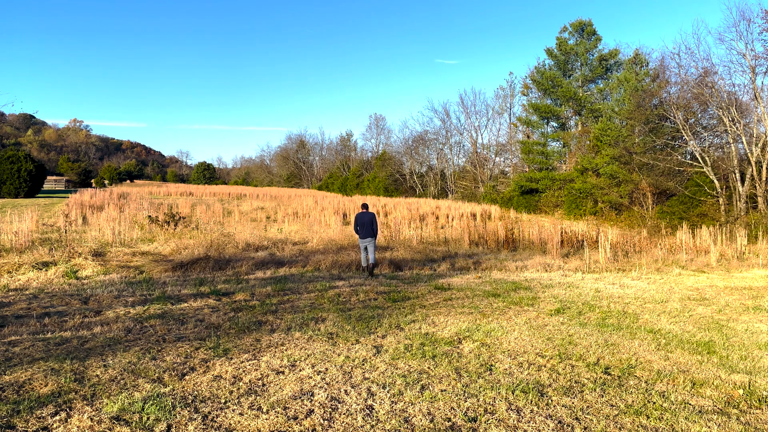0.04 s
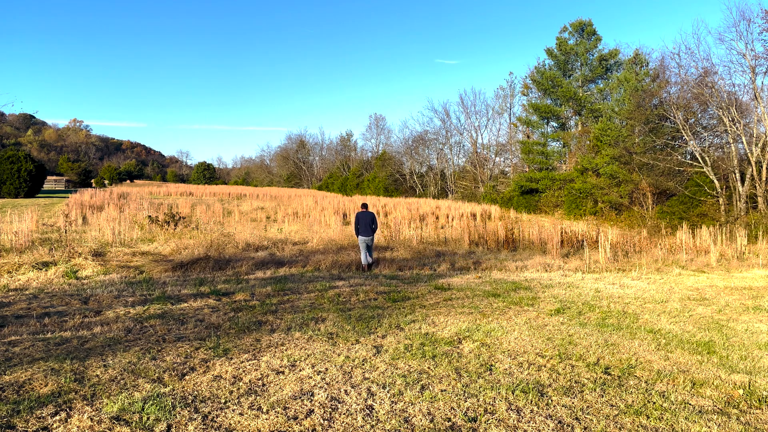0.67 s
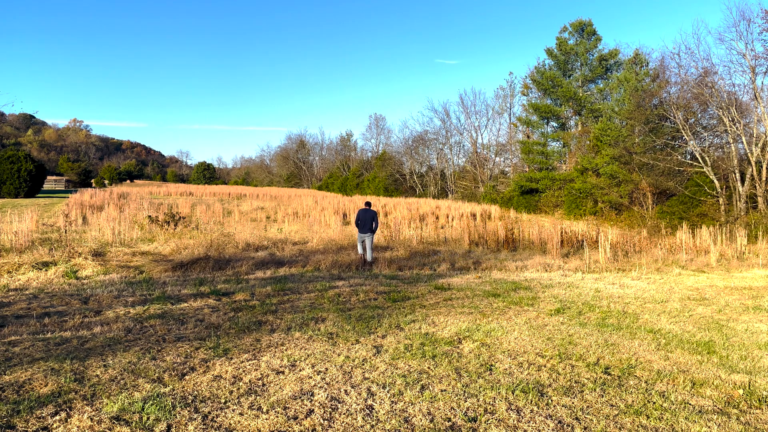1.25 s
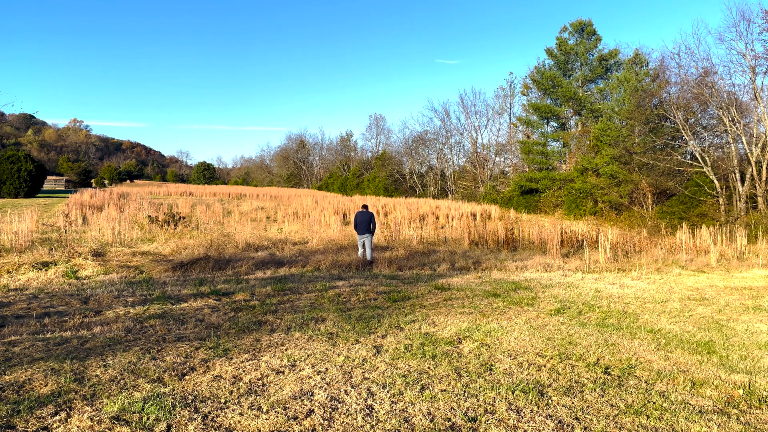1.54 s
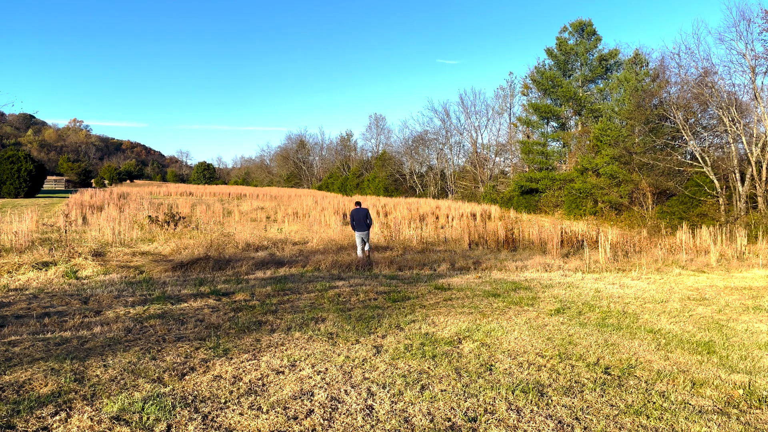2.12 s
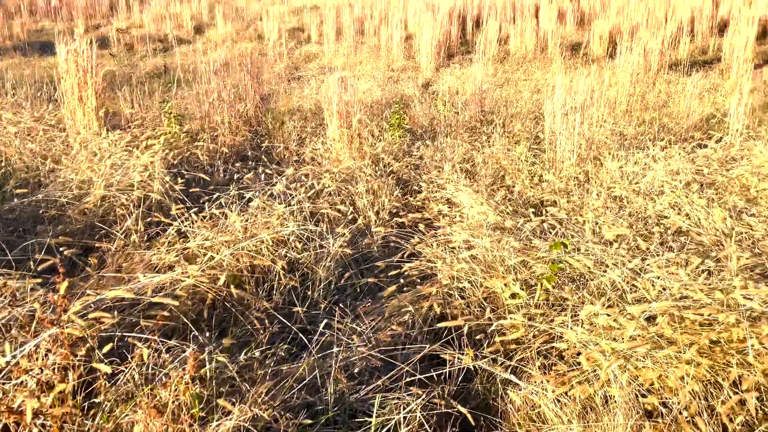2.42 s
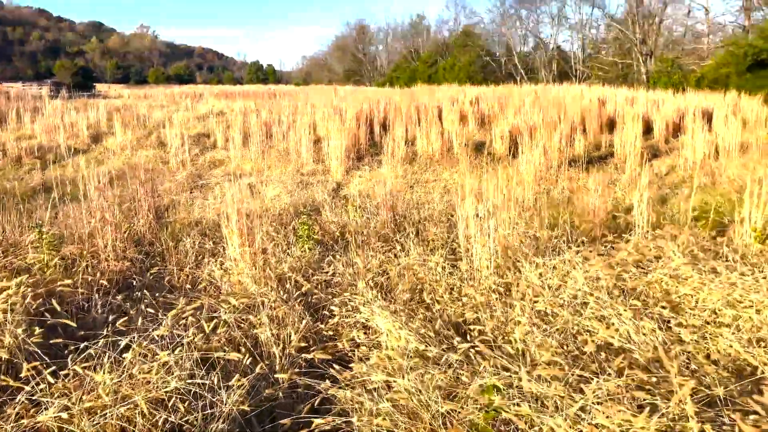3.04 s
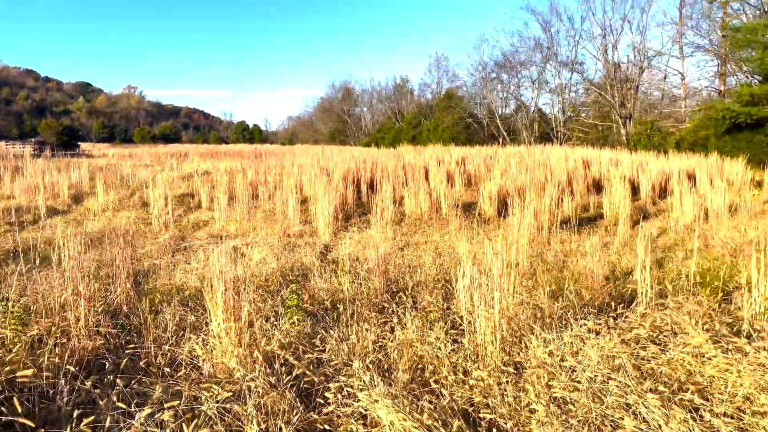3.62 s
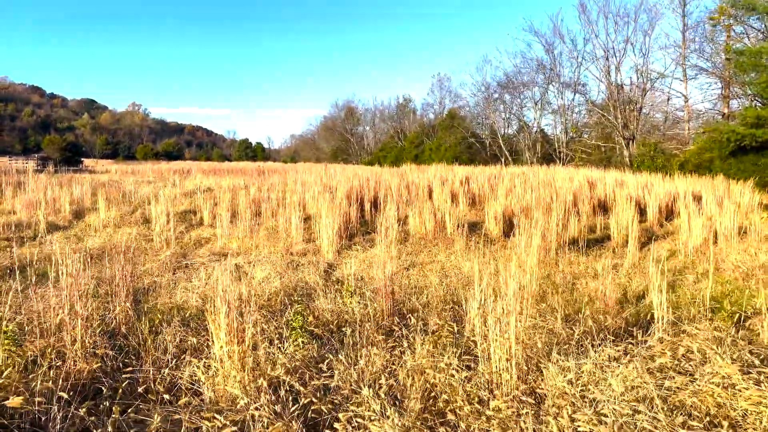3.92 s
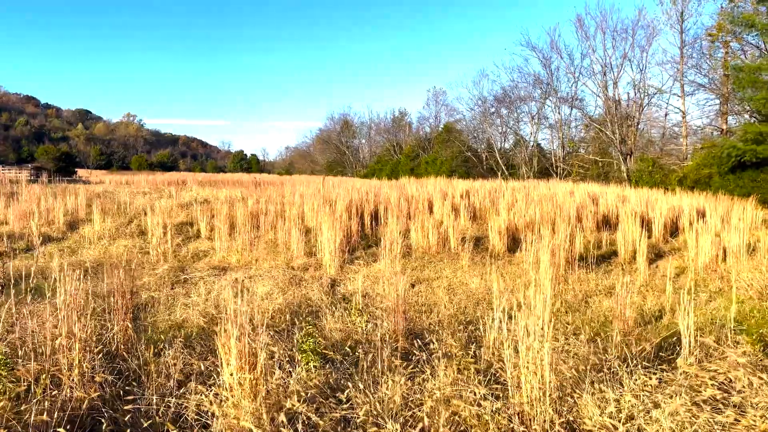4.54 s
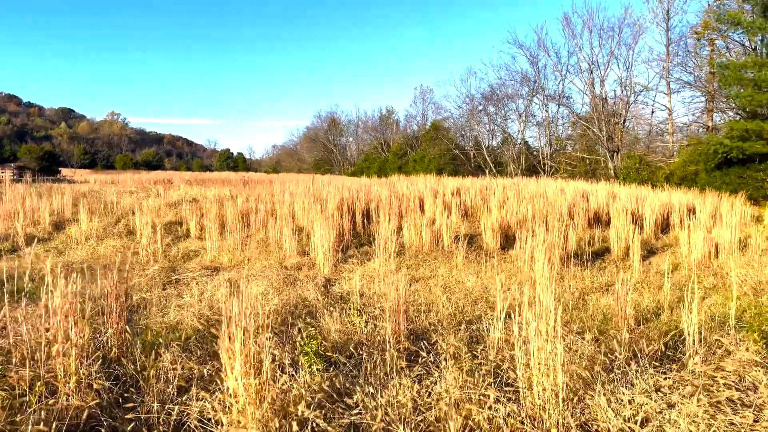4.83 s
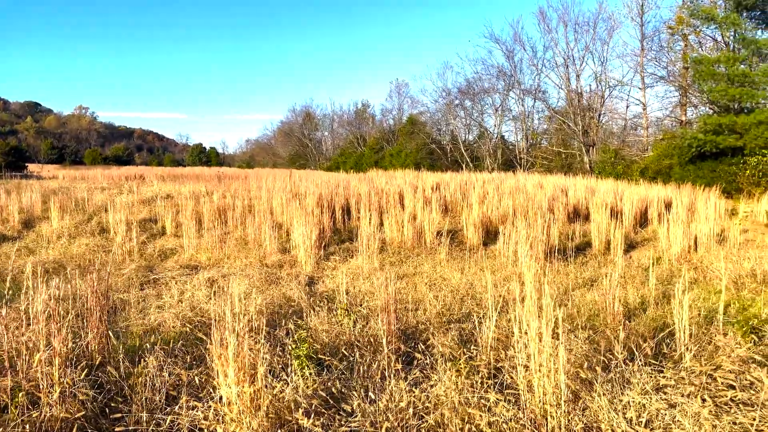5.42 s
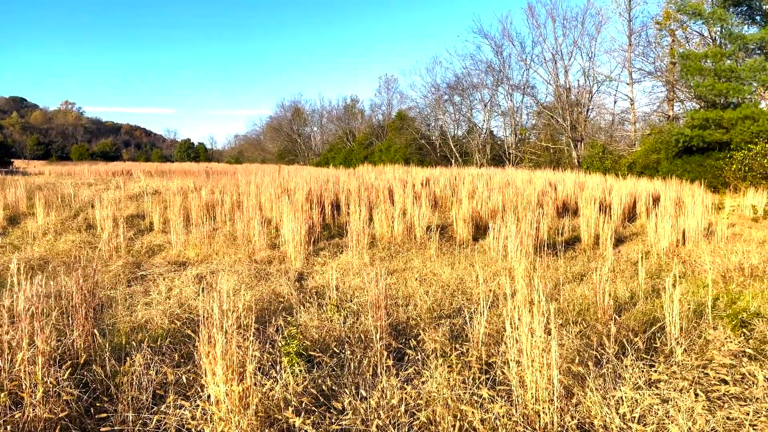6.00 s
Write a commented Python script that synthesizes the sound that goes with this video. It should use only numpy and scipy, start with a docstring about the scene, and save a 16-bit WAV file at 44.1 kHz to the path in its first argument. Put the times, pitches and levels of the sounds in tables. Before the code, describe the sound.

In open country, a phone microphone picks up low wind rumble, a soft hush and the hum of a distant engine. Light steps swish through dry grass at a distance, then suddenly sound close, each uneven stride a shower of tiny crackles with brittle stems breaking. One dull knock comes just after the steps turn close and another near the end, as the engine hum swells and the rustling eases.

```python
"""An open field of tall dry grass, picked up by a phone with two microphone ports. Someone walks through it,
first some way off, then with the stalks brushing close by. Each stride sets off a shower of tiny crackles as
blades catch and slip; single stems snap, and there are two dull knocks. Behind it lie a far engine, a low wind
rumble and the hush of distant traffic."""
import sys
import numpy as np
from scipy import signal
from scipy.fft import rfft, irfft, next_fast_len
from scipy.io import wavfile

SR = 44100
rng = np.random.default_rng(int(sys.argv[2]) if len(sys.argv) > 2 else 0)


def master_out(mix):
    """Clip the mix to full scale and print it as 16-bit PCM to the path in sys.argv[1]."""
    frames = np.transpose(np.atleast_2d(mix))
    ceiling = np.clip(frames, -1, 1)
    pcm = np.round(ceiling * 32767).astype(np.int16)
    wavfile.write(sys.argv[1], SR, pcm)


N = 276066
TIME = np.arange(N) / SR
FFT_SIZE = next_fast_len(N + 8192, True)
BIN_HZ = np.maximum(np.fft.rfftfreq(FFT_SIZE, 1 / SR), 1)
NEAR_FROM_S = 2.18  # the walker is heard close by from here on


def near_steps(blades_db=0.9, stems_db=-2.25, litter_db=4.5, usual_stride_db=-50):
    """Close by, blades swish past the legs and stems and litter crunch; a harder stride moves more."""
    # leg sweeps: start_s, attack_s, length_s, level_db, crunch_share_db, litter_share (0-1 of the crunch)
    strides = [(2.188, 0.012, 0.036, -59, -2.5, .9), (2.385, 0.049, 0.06, -47.5, -6.5, 0.45),
               (2.568, 0.049, 0.033, -45.5, -1.5, 0.07), (2.663, 0.011, 0.025, -49.5, -4, 0.31),
               (2.796, 0.042, 0.073, -48.5, -5, 0.35), (3.14, 0.023, 0.045, -63.5, -1, 1),
               (3.32, 0.051, 0.046, -55, -1.4, 0.57), (3.446, 0.036, 0.044, -63, -5, 0.9),
               (3.674, .02, 0.012, -53, -17, 0.4), (3.797, 0.092, 0.096, -53, -7.5, 0.55),
               (4.11, 0.18, 0.067, -65, 0, .7), (4.407, 0.012, .01, -52.5, -4, 1),
               (4.465, 0.042, .04, -49, -3.5, 0.6), (4.683, 0.059, .12, -51.5, -6, 0.66),
               (4.935, 0.048, 0.11, -65, -.3, 1), (5.166, 0.066, 0.042, -49, -4.5, 0.35),
               (5.511, 0.04, 0.13, -54.5, -6.5, .6), (5.714, 0.11, .16, -64.5, -3, 0.9)]
    # tone of the blades, the brittle stems and the soft litter: frequency_hz, gain_db
    blade_colour = [(400, -28), (1200, -16), (2500, -3.5), (4500, -5.5), (5600, -4.5), (6200, 1.5),
                    (7300, -9), (8800, 5), (12200, 2.5), (14000, -3), (16000, -11)]
    stem_colour = [(300, -24), (700, 5.5), (1150, -6), (1600, 2), (2400, -1.5), (3100, 6), (4200, 5.5),
                   (4900, 4.5), (6500, -22), (9000, -10), (16000, -22)]
    litter_colour = [(200, -23), (500, 9), (800, 3), (1300, 2), (2100, 0), (3200, -7.5), (6000, -7),
                     (9000, -7.5), (16000, -12)]
    blade_power = stem_power = litter_power = 0
    for start_s, attack_s, length_s, level_db, crunch_share_db, litter_share in strides:
        power = leg_sweep(start_s, length_s, level_db, attack_s, release_s=0.055)
        crunch_share = undb(crunch_share_db) ** 2
        blade_power += power * (1 - crunch_share)
        stem_power += power * crunch_share * (1 - litter_share)
        litter_power += power * crunch_share * litter_share
    amplitude = np.sqrt(blade_power + stem_power + litter_power)
    effort = np.maximum(np.sqrt(amplitude / undb(usual_stride_db)), 0.2)
    blades = crackle(7000 * effort, scatter_db=1.1, clump_db=1.12, clump_hz=89, q=2.5, patchy_db=4.4)
    stems = crackle(1200 * effort, scatter_db=1.5, clump_db=1.0, clump_hz=60, q=7.0, patchy_db=6.5)
    litter = crackle(4500 * effort, scatter_db=0.5, clump_db=1.5, clump_hz=87, q=4.8, patchy_db=2.0)
    rustle = (unit_rms(at_ports(blades, blade_colour)) * np.sqrt(blade_power) * undb(blades_db)
              + unit_rms(at_ports(stems, stem_colour)) * np.sqrt(stem_power) * undb(stems_db)
              + unit_rms(at_ports(litter, litter_colour)) * np.sqrt(litter_power) * undb(litter_db))
    return rustle * (TIME >= NEAR_FROM_S)


def far_steps(gain_db=0.07):
    """From a distance the crackles merge into a fine swish for each stride."""
    # leg sweeps some way off: start_s, length_s, level_db
    strides = [(0, 0.014, -60.5), (0.186, .01, -68.5), (0.407, .19, -58.5), (0.712, 0.11, -66),
               (0.977, 0.18, -62), (1.217, 0.2, -56.5), (1.68, 0.17, -67.5), (1.897, 0.28, -60)]
    # tone of the distant blades: frequency_hz, gain_db
    colour = [(400, -15), (1200, -10), (2200, -9.5), (3200, -6), (5000, -6), (6000, -12), (8000, -5),
              (10000, -4), (12000, 1.5), (14000, -1.5), (16000, -10.5)]
    power = sum(leg_sweep(*stride, attack_s=0.067, release_s=0.052) for stride in strides)
    blades = crackle(8300, scatter_db=0.0, clump_db=0.63, clump_hz=190, q=1.23, patchy_db=1.0)
    return unit_rms(at_ports(blades, colour)) * np.sqrt(power) * undb(gain_db) * (TIME < NEAR_FROM_S)


def leg_sweep(start_s, length_s, level_db, attack_s, release_s, sag_db_per_s=14, settle_db=-10.5):
    """Power of the rustle as a leg pushes through: it eases as the stalks give, then they spring back."""
    sag = undb(-sag_db_per_s * np.maximum(TIME - start_s, 0))
    push = swell(start_s, length_s, attack_s, release_s) * sag
    settle = undb(settle_db) * swell(start_s, length_s, attack_s, release_s=0.26)
    return undb(level_db) ** 2 * (push ** 2 + settle ** 2)


def crackle(clicks_per_s, scatter_db, clump_db, clump_hz, q, patchy_db):
    """Dry blades catch and slip: a shower of clicks that swells as each tuft springs free."""
    slips = rng.random(N) < clicks_per_s / SR
    scatter = np.minimum(rng.exponential(size=N), 5)
    clicks = slips * undb(scatter_db * scatter + clump_db * drift(clump_hz)) / np.sqrt(clicks_per_s)
    return stalk_ring(clicks, q, patchy_db)


def stalk_ring(clicks, q, patchy_db):
    """Each click rings its own mix of stalk resonances; gives a direct and a diffuse signal."""
    at = np.flatnonzero(clicks)
    weights = rng.standard_normal((2, N))
    push, out = np.zeros((2, N)), np.zeros((2, N))
    for hz in np.geomspace(800, 14500, 13):
        mix = weights[:, at - rng.integers(N)]
        tuft_gain = undb(patchy_db * drift(18, TIME[at]))  # each tuft favours other resonances
        push[:, at] = clicks[at] * mix * tuft_gain
        out += signal.lfilter(*signal.iirpeak(hz, q, SR), push + 1e-18)
    return out


def stem_snaps(q=1.27, crack_db=-21, gain_db=-2.5, samples=1024):
    """A stem breaks as its fibres tear in a moment and ring it; thick stems ring lower."""
    # the loudest breaking stems: start_s, level_db, pitch_hz, tear_ms
    breaks = [(.4123, -29.5, 13000, .7), (1.910, -36, 12500, .7), (2.201, -37, 12500, .8),
              (2.4079, -26, 11500, 2.3), (2.554, -29.5, 3780, 1.2), (2.592, -28, 3600, 3.6),
              (2.602, -23.5, 2090, 0.79), (2.623, -30.5, 4240, 1.2), (2.6685, -26, 10800, 1.2),
              (2.69, -32.5, 3480, 1.3), (2.7416, -31.5, 4000, 3.7), (2.838, -33, 4330, 2.1),
              (3.347, -30.5, 3050, 2.6), (3.348, -33.5, 1600, 2.9), (4.361, -45, 10400, 1.2),
              (4.691, -32.5, 2270, 3), (4.802, -30.5, 11000, 0.53), (4.84, -33, 5560, 0.46),
              (5.299, -34, 12500, 0.89), (5.537, -34, 3227, .45), (5.7685, -37, 11500, 0.65),
              (5.968, -39.5, 11500, 4.1), (5.9678, -44, 3000, 2.7), (6.0063, -39.5, 11600, 2.5),
              (6.0065, -42.5, 3000, 3.4)]
    # tone of the snaps: frequency_hz, gain_db
    colour = [(400, -32), (1500, -7.5), (13000, 5), (16000, -6)]
    out = np.zeros((2, N))
    t_ms = np.arange(samples) / SR * 1000
    for start_s, level_db, pitch_hz, tear_ms in breaks:
        fibres = rng.standard_normal((2, samples)) * np.exp(-t_ms / tear_ms)
        stem = signal.iirpeak(pitch_hz, q, SR)
        ring = signal.lfilter(*stem, signal.lfilter(*stem, fibres))
        snap = ring + undb(crack_db) * fibres
        i = int(start_s * SR)
        out[:, i:i + samples] += snap / np.abs(snap).max(axis=1, keepdims=True) * undb(level_db + gain_db)
    return at_ports(out, colour)


def knocks(contact_cycles=1.61, samples=4096):
    """Soft, heavily damped blows: the ring swells during the contact and is gone in a few cycles."""
    # three parts to each knock: start_s, peak_db, pitch_hz, t60_s, right_lag_ms, left_minus_right_db
    blows = [(2.5003, -24.5, 768, 0.013, 0.02, 2), (2.5104, -51, 800, .011, 0.02, 1),
             (2.5130, -36.5, 734, 0.015, 0.02, 5), (5.5381, -32.5, 1200, 0.0016, 0.21, 0),
             (5.537, -25, 482, 0.0072, 0.47, 1.5), (5.5376, -32.5, 133, 0.02, 0.4, -4)]
    # what a blow rings with: pitch_ratio, gain_db, t60_ratio
    modes = [(.9, 0.5, 1.3), (1.22, 1, 0.88), (2.7, -14, 1.2)]
    out = np.zeros((2, N))
    for start_s, peak_db, pitch_hz, t60_s, right_lag_ms, balance_db in blows:
        t = np.maximum(np.arange(samples) / SR - np.array([[0], [right_lag_ms / 1000]]), 0)
        contact_s = contact_cycles / pitch_hz
        ring = 0
        for pitch_ratio, gain_db, t60_ratio in modes:
            decay = undb(gain_db - 60 * t / (t60_s * t60_ratio))
            ring += decay * np.cos(2 * np.pi * pitch_hz * pitch_ratio * (t - contact_s))
        ring *= 1 - np.exp(-(t / contact_s) ** 3)
        port_db = peak_db + np.array([[balance_db], [-balance_db]]) / 2
        i = int(start_s * SR)
        out[:, i:i + samples] += ring / np.abs(ring).max() * undb(port_db)
    return out


def stirring_grass(level_db=-68):
    """Close to the microphone a soft rustle goes on between the strides."""
    # tone of the stirring grass: frequency_hz, gain_db
    colour = [(400, -30), (900, 0), (1400, 5.5), (2100, -0.5), (3300, -8), (6000, -9), (12000, -8),
              (16000, -23)]
    rustle = crackle(3300, scatter_db=-1.0, clump_db=3.9, clump_hz=30, q=4.0, patchy_db=0.0)
    return unit_rms(at_ports(rustle, colour)) * undb(level_db) * (TIME >= NEAR_FROM_S)


def far_engine(waver=0.00602, throb_db=2.0):
    """A far engine drones at harmonics of its firing rate and slowly grows."""
    # course of the drone: time_s, firing_hz, level_db
    course = [(0, 62.44, -65.5), (1.9, 61.54, -62), (2.3, 56.6, -56), (4.4, 55.6, -56), (4.9, 55.8, -49.5),
              (5.4, 56.2, -47), (6.26, 56.5, -51)]
    # its harmonics: firing_multiple, gain_db
    harmonics = [(1, -11.5), (2, -1.5), (4, -21)]
    time_s, *columns = np.transpose(course)
    firing_hz, level_db = [np.interp(TIME, time_s, column) for column in columns]
    phase = 2 * np.pi * np.cumsum(firing_hz * (1 + waver * drift(5.98))) / SR
    drone = sum(np.sqrt(2) * undb(gain_db + throb_db * drift(5.9)) * np.sin(multiple * phase)
                for multiple, gain_db in harmonics)
    return drone * undb(level_db + np.array([[0.5], [-0.5]]))


def open_field(rumble_db=-47.5, hush_db=-60, hiss_db=-75, hush_drift_db=0.36, gust_edge_s=0.033):
    """Low wind rumble, the broad hush of distant traffic off to the left, and a faint hiss."""
    # gusts that lift the rumble: start_s, length_s, rise_db
    gusts = [(0.093, 0.09, 2.5), (2.232, 0.099, 3), (2.88, .4, 1), (3.75, 0.12, 1.5)]
    # tone of the wind, the distant traffic and the hiss: frequency_hz, gain_db
    rumble_colour = [(10, -25), (25, -26.5), (40, -9.5), (60, 2.5), (80, -4), (110, -10.5), (160, -18),
                     (240, -24.5), (500, -35), (2000, -112)]
    hush_colour = [(80, -66), (200, -15), (340, -4), (520, 4.5), (720, 4.5), (1000, -6), (1500, -16),
                   (2300, -33), (5000, -58)]
    hiss_colour = [(1200, -5), (2500, -8), (5000, 2.5), (6200, -6), (9000, 4), (12500, 0.5), (16000, -14.5)]
    gust_db = sum(rise_db * swell(start_s, length_s, gust_edge_s, gust_edge_s)
                  for start_s, length_s, rise_db in gusts)
    rumble = air_noise(rumble_colour) * undb(rumble_db + gust_db)
    hush = air_noise(hush_colour, right_lag_ms=0.48) * undb(hush_db + hush_drift_db * drift(2.8))
    hiss = air_noise(hiss_colour) * undb(hiss_db)
    return rumble + hush + hiss


def air_noise(colour, right_lag_ms=0):
    """Steady coloured noise at the two ports."""
    return unit_rms(at_ports(rng.standard_normal((2, N)), colour, right_lag_ms))


def at_ports(pair, colour, right_lag_ms=0):
    """Colour a direct and a diffuse signal at the ports; sound from the left reaches the right late."""
    # the microphone pair: frequency_hz, left_lead_rad, left_minus_right_db, diffuse_share_db
    ports = [(60, .12, .7, -15), (150, .35, 1.6, -11), (600, .4, 3, -5), (950, .3, .5, -5),
             (1400, 0, 0, -7), (2200, .1, -.8, -10), (3300, .8, 3, -8), (5000, 1.1, 7, -6),
             (5900, -.6, 3, -4), (6900, -.4, 2.5, -5), (7700, -2.7, .5, -10), (8500, -3.14, 0, -25),
             (10000, -4.05, 0, -12), (12400, -5.4, 0, -12), (13400, -6.28, 0, -26)]
    lead_rad, balance_db, diffuse_db = per_bin(ports)
    direct, diffuse = rfft(pair, FFT_SIZE)
    share, sides = undb(diffuse_db), np.array([[1], [-1]])
    stereo = (direct + sides * share * diffuse) / np.sqrt(1 + share ** 2)
    stereo *= undb(per_bin(colour)[0] + sides * balance_db / 2)
    stereo[1] *= np.exp(-1j * (lead_rad + 2 * np.pi * BIN_HZ * right_lag_ms / 1000))
    return irfft(stereo, FFT_SIZE)[:, :N]


def swell(start_s, length_s, attack_s, release_s):
    """An envelope that reaches 1 at start_s, holds and dies away."""
    before_s = np.maximum(start_s - TIME, 0)
    after_s = np.maximum(TIME - start_s - length_s, 0)
    return np.exp(-before_s / attack_s - after_s / release_s)


def drift(rate_hz, times=TIME):
    """A random curve that turns rate_hz times a second; spread near 1."""
    knots = rng.standard_normal(4096)
    return 1.222 * np.interp(times * rate_hz, np.arange(len(knots)), knots)


def per_bin(table):
    """The columns of a table over frequency, one value a bin."""
    hz, *columns = np.transpose(table)
    return [np.interp(np.log(BIN_HZ), np.log(hz), column) for column in columns]


def unit_rms(stereo):
    """Scale a stereo pair so that its middle has rms 1."""
    return stereo / np.std(stereo.mean(axis=0))


def undb(db):
    """Decibels to gain."""
    return 10 ** (np.asarray(db) / 20)


def scene():
    """The walk and the field around it; the open ground gives no echo."""
    walk = far_steps() + near_steps() + stirring_grass() + stem_snaps() + knocks()
    return walk + far_engine() + open_field()


def record(dry):
    """The phone cuts the deepest rumble and the top of the treble."""
    low_cut = signal.butter(4, 26, "high", fs=SR, output="sos")
    high_cut = signal.ellip(10, 0.2, 70, 15850, fs=SR, output="sos")
    return signal.sosfilt(high_cut, signal.sosfilt(low_cut, dry))


dry = scene()
out = record(dry)
master_out(out)
```